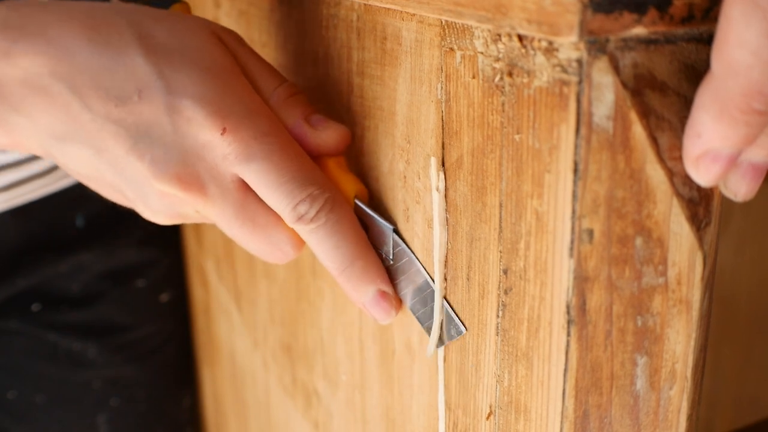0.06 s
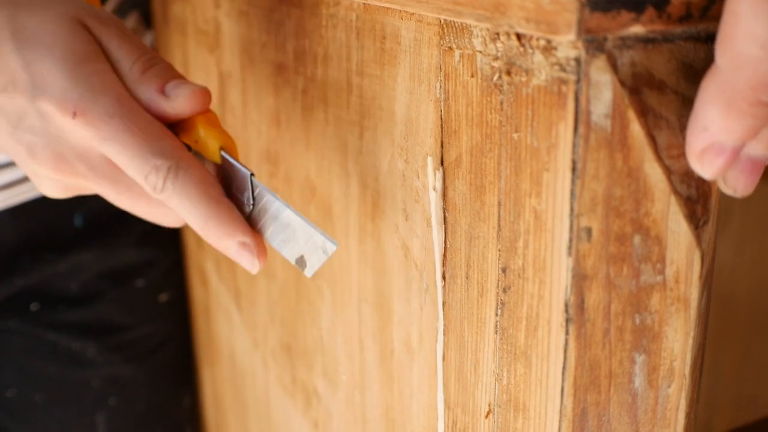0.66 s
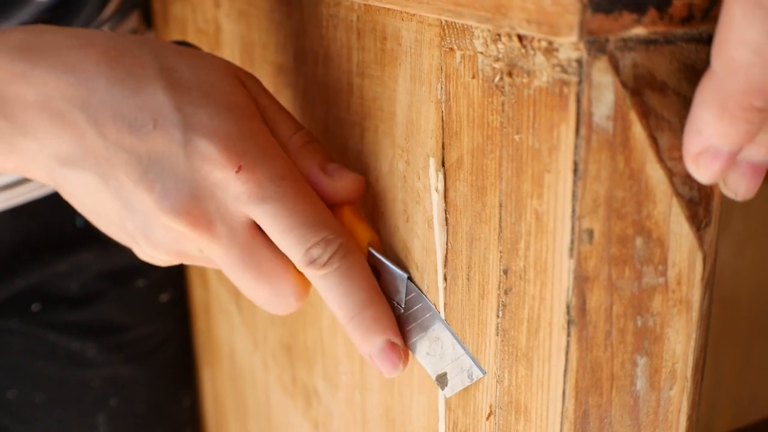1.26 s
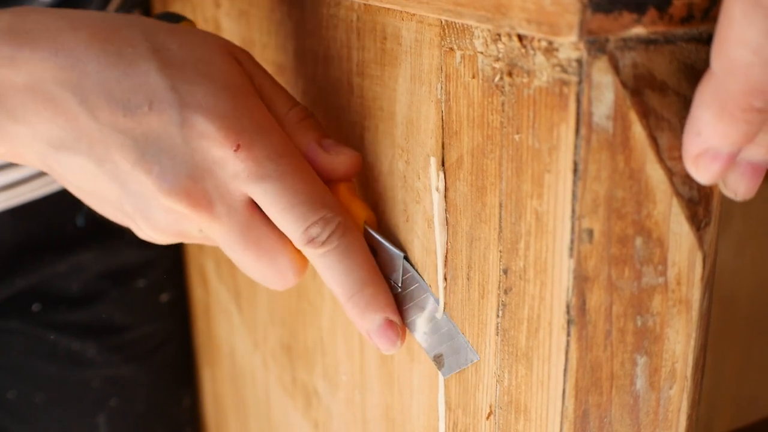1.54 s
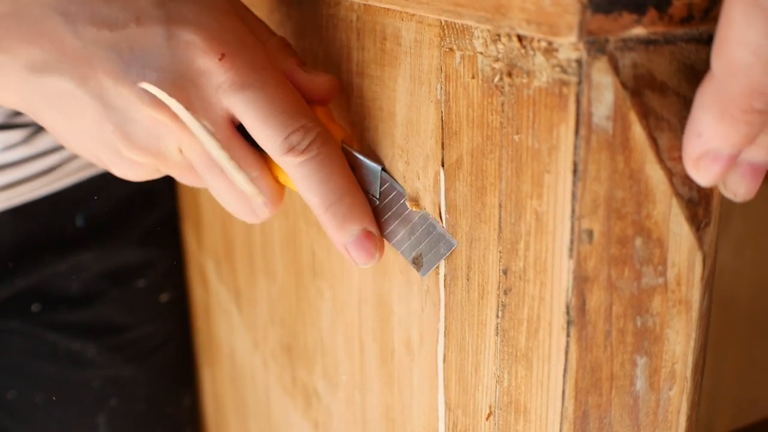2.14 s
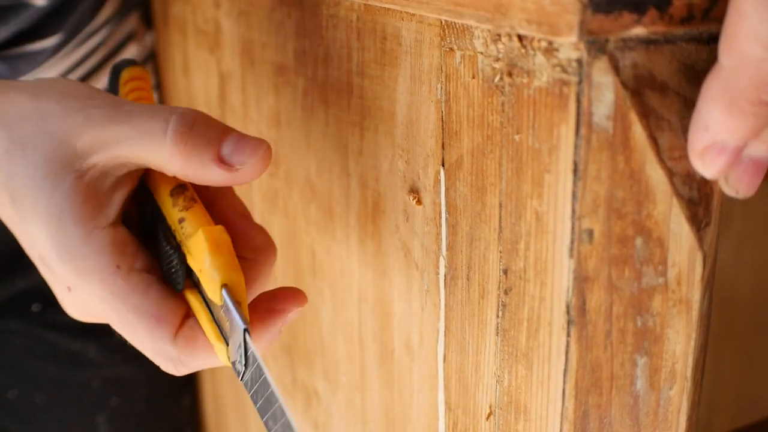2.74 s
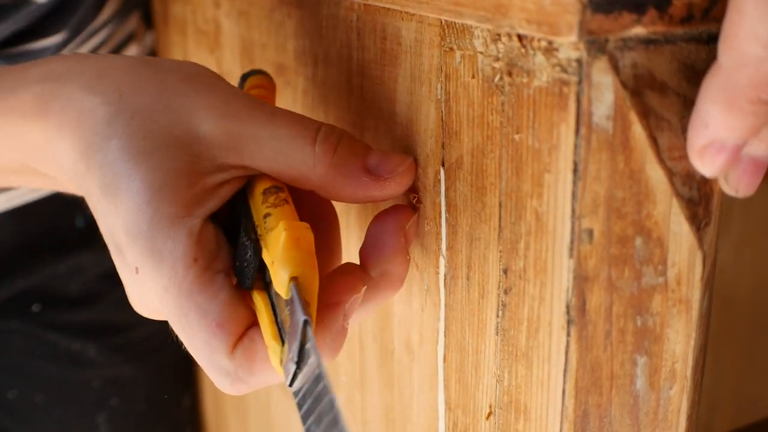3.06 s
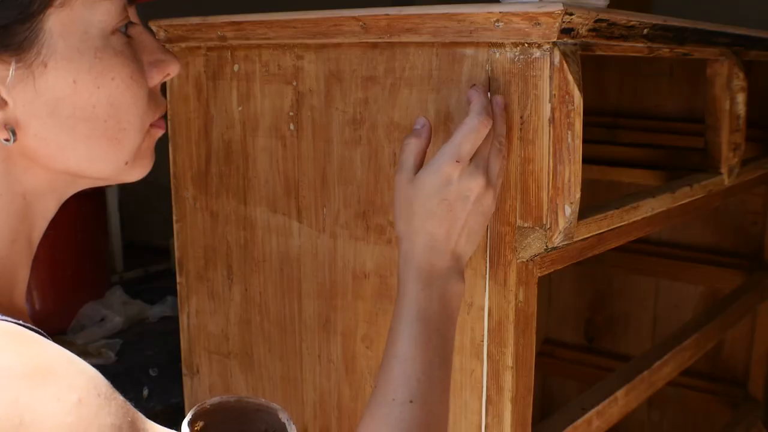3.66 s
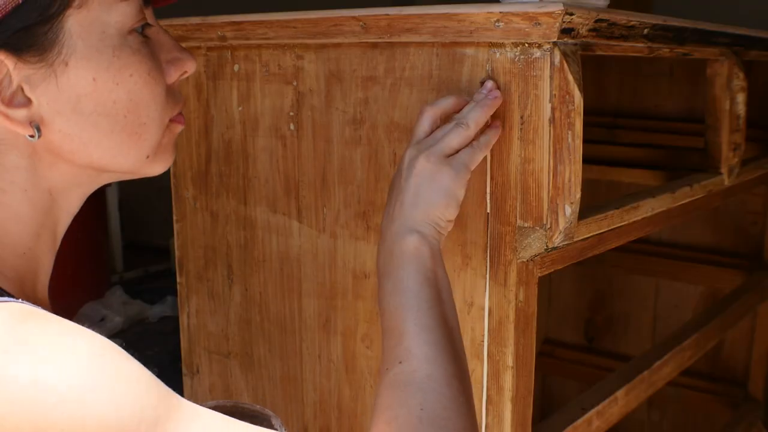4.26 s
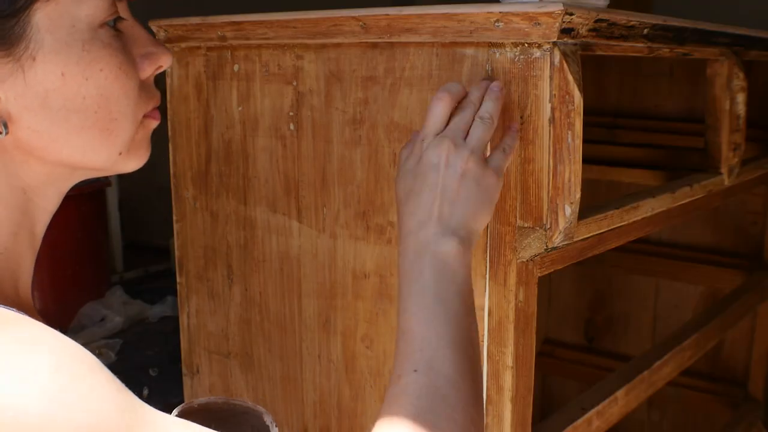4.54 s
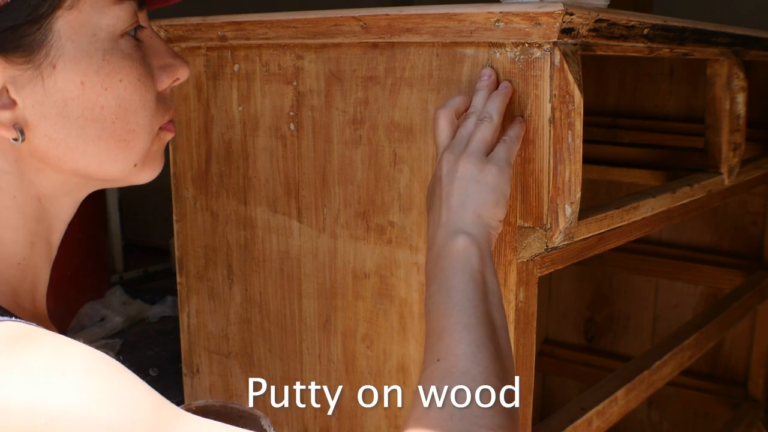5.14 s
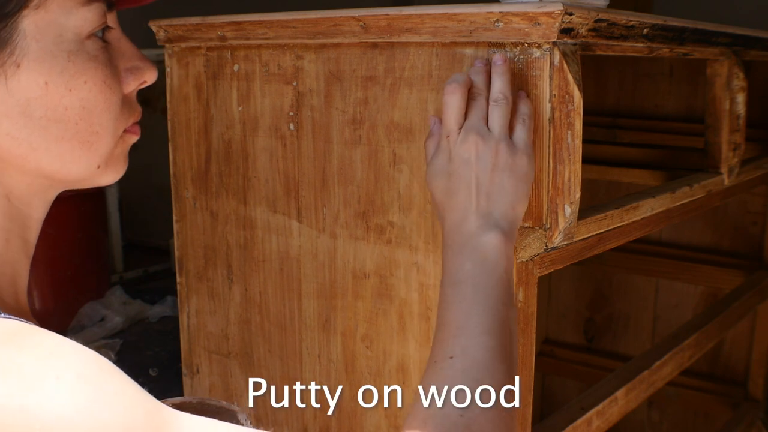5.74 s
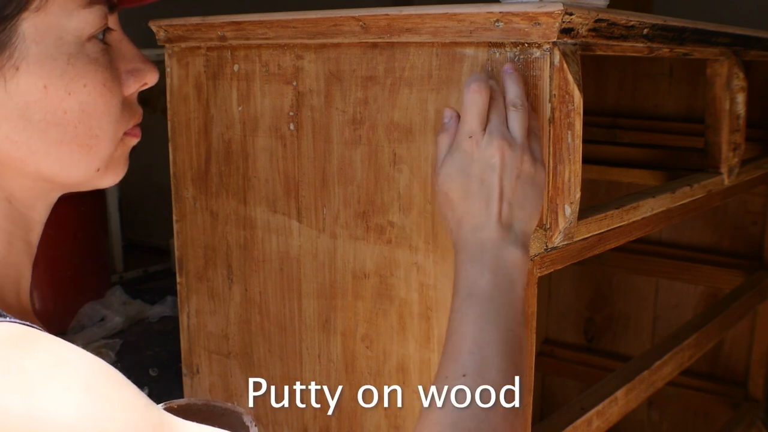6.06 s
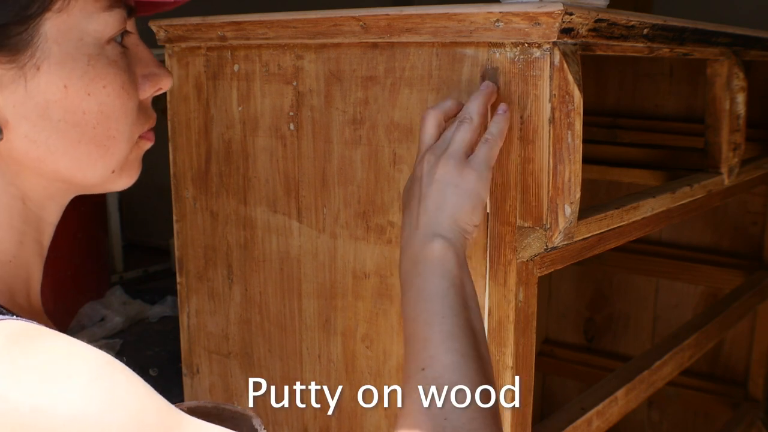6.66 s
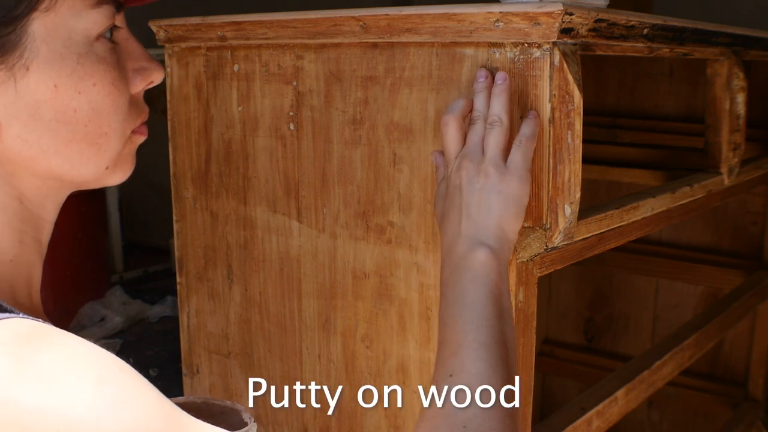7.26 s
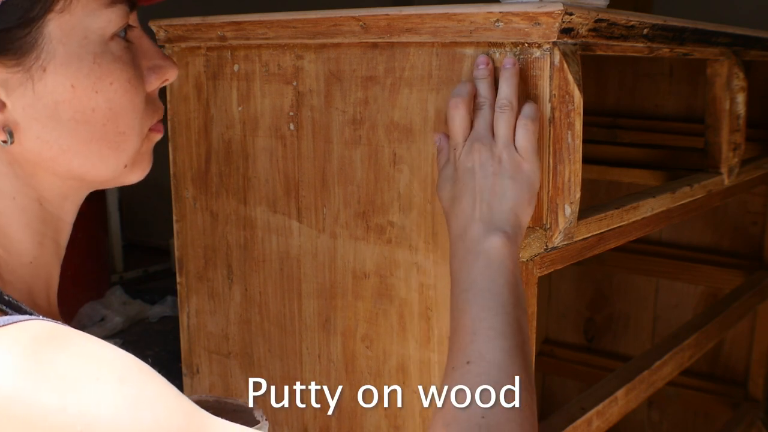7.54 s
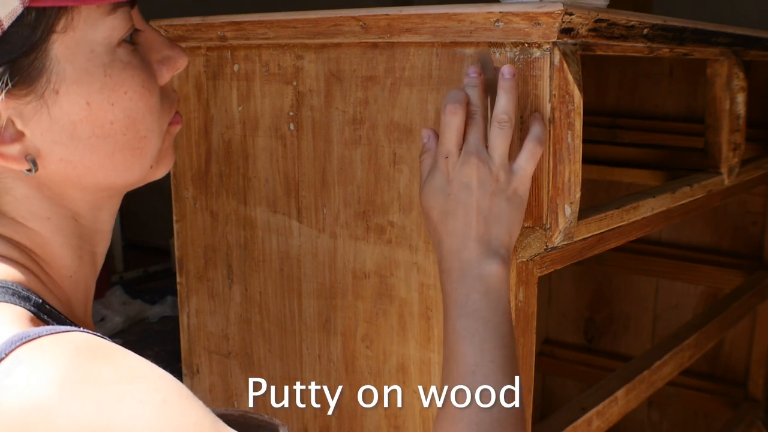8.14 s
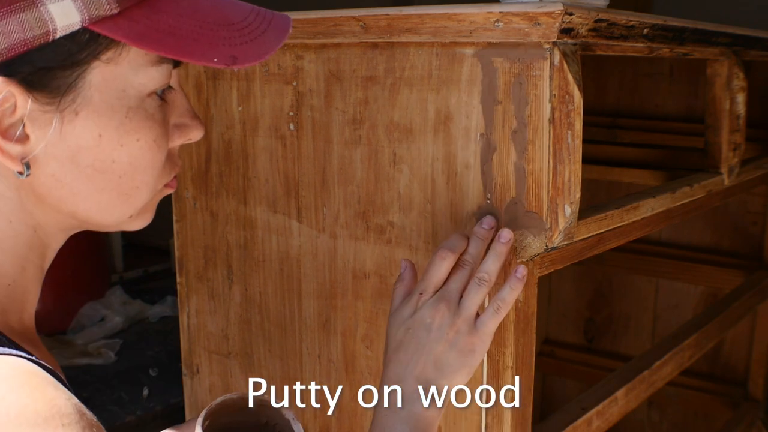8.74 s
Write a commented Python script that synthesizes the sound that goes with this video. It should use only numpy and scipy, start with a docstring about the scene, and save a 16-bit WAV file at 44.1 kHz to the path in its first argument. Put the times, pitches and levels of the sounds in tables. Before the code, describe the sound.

A knife blade pares filler from a wooden panel in short, gritty strokes, with sharp snaps, ticks and hollow knocks, then rattles lightly in its handle. Soft, sticky fingertip wipes follow. The stereo microphone is close to this outdoor work, with a street far behind: traffic murmurs throughout, and in the second half come thin squeals, passing tyres, a motor's hum and finally a low engine drone gathering speed.

```python
"""Outdoors at a wooden cabinet, a stereo microphone close to the work and the street far behind.
A snap-off utility knife pares a strip of filler from a crack: the blade rasps through the fibres, breaks
through with a snap, knocks the panel and rattles in its plastic handle. Then fingertips smear putty into
the crack. Traffic murmurs throughout; far off come faint squeals, the tyres of a passing car, an idling
motor and the swelling drone of an engine."""
import sys
import numpy as np
from scipy import signal
from scipy.fft import rfft, irfft, next_fast_len
from scipy.io import wavfile

SR = 44100
rng = np.random.default_rng(int(sys.argv[2]) if len(sys.argv) > 2 else 0)


def transcribe(u):
    """Save the signal u as a 16-bit wav file named by the first command-line argument.

    u: samples, shape (n,) or (channels, n), limited to [-1, 1]; the rate is SR.
    q: integer samples, one column per channel.
    """
    v = np.clip(np.atleast_2d(u).T, -1, 1)
    q = np.round(v * 32767).astype(np.int16)
    wavfile.write(sys.argv[1], SR, q)


N = 397326
TIME = np.arange(N) / SR
COARSE_TIME = TIME[::32]
FFT_SIZE = next_fast_len(N + SR // 2)
FREQ = np.maximum(np.arange(FFT_SIZE // 2 + 1) * SR / FFT_SIZE, 1)
RISE_SHARE = 0.037   # a soft contact swells and dies slowly: rise time as a share of its t60


def amp(db):
    """Decibels to gain."""
    return np.exp(np.asarray(db) * (np.log(10) / 20))


def unit_rms(x):
    """Scale to unit power."""
    return x / np.sqrt(np.mean(x ** 2) + 1e-20)


def curves(rows):
    """Each column after the first, joined by straight lines in time."""
    times, *columns = np.transpose(rows)
    return [np.interp(TIME, times, column) for column in columns]


def gate(start, end, fade_s):
    """A gate with sloping edges."""
    return np.clip(np.minimum(TIME - start, end - TIME) / fade_s + .5, 0, 1)


def gains(colour):
    """Gain at every frequency from (freq_hz, level_db) points."""
    hz, db = np.transpose(colour)
    return amp(np.interp(np.log(FREQ), np.log(hz), db))


def shaped(x, gain):
    """Colour a sound with a gain for every frequency."""
    return irfft(rfft(x, FFT_SIZE) * gain, FFT_SIZE)[..., :N]


def butter(x, hz, kind, order=2):
    """Butterworth filter."""
    return signal.sosfilt(signal.butter(order, hz, kind, fs=SR, output="sos"), x + 1e-18)


def panned(x, left_db):
    """Place a sound by its left-minus-right level."""
    return x * amp(np.array([[1], [-1]]) * left_db / 2)


def drift(rate_hz):
    """A random wander with spread 1."""
    return unit_rms(np.interp(TIME * rate_hz, np.arange(8192), rng.standard_normal(8192)))


def tone(hz):
    """A sine of unit power that follows a pitch curve."""
    return np.sqrt(2) * np.sin(2 * np.pi * np.cumsum(hz) / SR)


def grains(per_s, spread_db):
    """Random clicks of uneven size, at unit power."""
    out = np.zeros(N)
    at = np.flatnonzero(rng.random(N) < per_s / SR)
    out[at] = amp(spread_db * np.minimum(rng.exponential(1, len(at)), 4)) * rng.standard_normal(len(at))
    return unit_rms(out)


def bursts(rows):
    """Summed envelope of contacts (start_s, level_db, rise_s, t60_s): a swell, then an exponential fall."""
    out = np.zeros(N)
    for start, db, rise, t60 in rows:
        first = int(start * SR)
        age = TIME[:min(SR // 2, N - first)]
        fall = amp(db - 60 * np.maximum(age - rise, 0) / t60)
        out[first:first + len(age)] += np.minimum(age / rise, 1) * fall
    return out


def resonate(force, modes, ring_db):
    """A contact heard directly and, in the first 4 s, through the modes of the body it shakes."""
    out, drive = force.copy(), force[:4 * SR] + 1e-18
    for hz, db, t60 in modes:
        radius, angle = amp(-60 / (t60 * SR)), 2 * np.pi * hz / SR
        ringing = signal.lfilter([0, np.sin(angle)], [1, -2 * radius * np.cos(angle), radius ** 2], drive)
        out[:len(drive)] += ringing * amp(db + ring_db) * 2 * np.log(1000) / (t60 * SR)
    return out


def strike(times, levels_db, modes, detune):
    """Blows ring a body, each slightly out of tune; levels_db has one level per blow and mode."""
    hz, mode_db, t60 = np.transpose(modes)
    out, age = np.zeros(N), TIME[:SR // 5]
    polarity = (-1.) ** np.arange(len(hz))[:, None]
    decays = polarity * amp(-60 * age / t60[:, None])
    tunings = hz * (1 + detune * rng.standard_normal(levels_db.shape))
    for start, db, pitches in zip(times, levels_db, tunings):
        first = int(start * SR)
        partials = decays * np.sin(2 * np.pi * pitches[:, None] * age)
        out[first:first + len(age)] += amp(db + mode_db) @ partials
    return out


def clicks(rows, clack_hz, tick_hz, clack_db, tick_db):
    """Each contact is a tight cluster of tiny slips: a low clack and a high tick."""
    clack = bursts([(start, db + clack_db, RISE_SHARE * t60, t60) for start, db, _, t60 in rows])
    tick = bursts([(start, db + tick_db, RISE_SHARE * t60, t60) for start, _, db, t60 in rows])
    slips = grains(20000, 1.6)
    low, high = [unit_rms(butter(slips, band, "band")) for band in (clack_hz, tick_hz)]
    return clack * low + tick * high


def pings(rows, modes, low_db, high_db, detune, spread_db=5.0):
    """The first hard touch of each contact sets the knife ringing, differently every time."""
    start, clack, tick, t60 = np.transpose(rows)
    is_high = np.array(modes)[:, 0] > 6000
    levels = np.where(is_high, tick[:, None] + high_db, clack[:, None] + low_db)
    levels += spread_db * rng.standard_normal(levels.shape)
    return strike(start + RISE_SHARE * t60 / 2, levels, modes, detune)


MIDDLE_S = (3.67, 8.48)   # the background steps abruptly in level and colour at these two times
# far traffic before, during and after the middle stretch: level_db, left_lead_s
MURMUR_STRETCHES = [(-48.5, .00005), (-44, .0002), (-51.5, 0.00017)]
# its colour in each stretch: freq_hz, level_db
MURMUR_EARLY = [(30, -44), (55, -28.5), (80, -15.5), (125, -4.5), (160, 2), (240, -3.5), (350, -10),
                (520, -8.5), (700, -6), (900, -10), (1100, -6.5), (1700, -21.5), (3000, -31), (6000, -41.5),
                (9000, -54)]
MURMUR_MIDDLE = [(30, -53), (50, -26), (76, -19.5), (110, -13.5), (150, -6.5), (210, -6.5), (290, -13),
                 (440, -14.5), (560, -12), (870, -14), (1620, -24.5), (2420, -35), (6000, -55.5), (9000, -65)]
MURMUR_LATE = [(30, -38), (75, -7.5), (130, -7.5), (210, -0.5), (380, -14), (480, -11), (700, -13),
               (1100, -22), (1860, -29), (2600, -36), (3700, -38.5), (6000, -46), (9000, -53)]
# its width across the microphones: freq_hz, side_minus_mid_db
MURMUR_WIDTH = [(30, -22), (80, -40), (200, -30), (400, -18), (700, -7), (1100, -2), (2400, -1), (6000, -1)]
# its lean to the left: freq_hz, left_minus_right_db
MURMUR_LEAN = [(150, 0), (400, 1), (700, 2.5), (1200, 3.5), (2400, 3), (5000, 0)]
# its slow swell: time_s, gain_db
MURMUR_SWELL = [(0.2, -0.5), (1.3, -2), (2.0, 0.74), (3.4, 1.5), (4.1, 0.5), (5.3, -0.5), (6.7, 1.67),
                (8.4, 2.5)]

def traffic_murmur():
    """Far traffic: alike on both sides in the bass, diffuse above, reaching the left microphone first."""
    mid, side = rfft(rng.standard_normal((2, N)), FFT_SIZE)
    spectrum = mid + np.array([[1], [-1]]) * side * gains(MURMUR_WIDTH)
    spectrum = panned(spectrum, 20 * np.log10(gains(MURMUR_LEAN)))
    edges, midrange = [-1, *MIDDLE_S, 10], (FREQ > 250) & (FREQ < 1600)
    colours = gains(MURMUR_EARLY), gains(MURMUR_MIDDLE), gains(MURMUR_LATE)
    out = 0
    for start, end, colour, (db, lead) in zip(edges, edges[1:], colours, MURMUR_STRETCHES):
        gain = colour / np.sqrt(np.mean(colour ** 2 * midrange))
        turn = np.exp(1j * np.pi * FREQ * lead * FREQ / (FREQ + 350))   # the lead shrinks in the bass
        stretch = irfft(spectrum * gain * np.array([turn, turn.conj()]), FFT_SIZE)[:, :N]
        out += amp(db) * gate(start, end, .01) * stretch
    return out * amp(curves(MURMUR_SWELL)[0])


# the microphones' own noise: freq_hz, level_db
HISS_COLOUR = [(2000, -6), (4000, -6), (6500, 1), (8000, -1), (10000, 2), (12500, -2), (15500, -5)]

def microphone_hiss(level_db=-70.0, unshared_db=0.5):
    """Faint steady hiss, partly shared by the two microphones."""
    noise = rng.standard_normal(N) + amp(unshared_db) * rng.standard_normal((2, N))
    return amp(level_db) * unit_rms(shaped(noise, gains(HISS_COLOUR)))


# blade strokes, close up: full_pressure_s, held_s, rise_s, release_s, rasp_db, hiss_db, panel_db
STROKES = [(0.085, 0.084, 0.11, .03, -51, -46, -44.5), (0.342, 0.05, 0.07, .09, -53, -47.5, -43),
           (0.468, 0.042, 0.095, 0.039, -44, -43, -36.5), (0.565, 0.035, 0.049, 0.15, -39.5, -44, -50.5),
           (0.696, 0.0052, 0.015, 0.013, -40.5, -30, -64), (1.56, .05, 0.29, .05, -62, -64.5, -67),
           (1.672, 0.026, 0.062, 0.027, -46.5, -45, -41), (1.95, 0.051, .10, 0.044, -52, -51.5, -50),
           (2.15, 0.0092, 0.043, 0.11, -42, -50, -37), (2.36, 0.021, 0.065, .015, -57, -57, -62),
           (2.434, 0.035, 0.032, 0.026, -41, -37.5, -48.5)]
# colours of the cut and of the drag on the panel: freq_hz, level_db
RASP_COLOUR = [(300, -30), (1200, -7.5), (1850, -1.5), (2350, 1.5), (3200, -1), (4000, -5.5), (5000, -7),
               (6300, -8), (7600, -7), (8500, -2), (9300, -2), (10200, 0), (11800, -2), (13400, -6),
               (15500, -13)]
DRAG_COLOUR = [(40, -45.5), (100, -8), (160, 0.5), (300, -10.5), (480, 1), (750, -1), (1300, 0.5),
               (1900, -15), (3000, -34)]

def scraping(linger_db=-14.5, linger_t60_s=.55, snags_per_s=80, snag_s=.001, split_hz=5500):
    """The edge tears fibres unevenly and snags. Returns the forces on the blade and on the panel."""
    start, held, rise, release, *levels_db = np.transpose(STROKES)[:, :, None]
    before, after = np.maximum(start - COARSE_TIME, 0), np.maximum(COARSE_TIME - start - held, 0)
    pressure_db = -20 * (before / rise + after / release)
    cutting, fibres, bite = [np.interp(TIME, COARSE_TIME, amp(np.max(db + pressure_db, axis=0)))
                             for db in levels_db]
    linger = bursts([(at, db + linger_db, hold, linger_t60_s) for at, hold, _, _, db, _, _ in STROKES])
    chatter = amp(.97 * drift(140))
    # stiff fibres hold the edge for an instant
    snags = (rng.random(N) < snags_per_s / SR) * rng.uniform(0, 2.2, N)
    grit = 1 + .9 * signal.lfilter([1], [1, -np.exp(-1 / (snag_s * SR))], snags + 1e-18)
    tearing = shaped(grains(14000, 2.5), gains(RASP_COLOUR))
    low, high = [unit_rms(butter(tearing, split_hz, kind, order=4)) for kind in ("low", "high")]
    rasp = amp(-4) * np.maximum(cutting * grit, linger) * low
    hiss = amp(-2.5) * fibres * grit * high
    drag = amp(-2) * bite * unit_rms(shaped(grains(2500, 2.5), gains(DRAG_COLOUR)))
    return (rasp + hiss) * chatter, drag * chatter


# the cabinet panel: pitch_hz, level_db, t60_s
PANEL_MODES = [(125, -5, 0.17), (170, -8, .15), (232, -6, 0.15), (405.7, -1.5, 0.17), (458, -3.5, 0.15),
               (517, -2, .15), (604.5, -6, .14), (660, -7.5, .09), (750, -7, 0.11), (805, -6, .09),
               (925, -9, .09), (1035, -7.5, .08), (1255, -11, .09), (1400, -16, .08)]
# hand and handle bump it: start_s, level_db, favoured_hz
KNOCKS = [(0.517, -34.5, 800), (1.124, -34, 800), (1.139, -39.5, 476), (2.137, -42, 1100),
          (2.149, -30, 1100), (2.160, -32.5, 540), (2.176, -37, 380), (2.184, -31, 170),
          (2.215, -38.5, 420), (8.641, -41, 750)]

def cabinet_panel(drag, db_per_octave=5.0, spread_db=.64):
    """Drag and soft bumps ring the panel; a bump feeds the modes near the pitch its spot favours."""
    start, db, favoured_hz = np.transpose(KNOCKS)
    octaves_off = np.abs(np.log2(np.array(PANEL_MODES)[:, 0] / favoured_hz[:, None]))
    levels = db[:, None] - db_per_octave * octaves_off + spread_db * rng.standard_normal(octaves_off.shape)
    knocks = butter(strike(start, levels, PANEL_MODES, detune=.008), [90, 1700], "band")
    return resonate(drag, PANEL_MODES, ring_db=1.5) + knocks


# the blade catches on the wood: start_s, clack_db, tick_db, t60_s
CATCHES = [(0.078, -54, -49, .015), (0.1385, -35, -35, 0.015), (0.153, -56, -49, 0.013),
           (0.162, -51, -44, 0.013), (0.169, -46, -47, 0.011), (0.683, -50, -37, .02),
           (0.9755, -28.5, -28, 0.036), (1.076, -46, -48, 0.024), (1.101, -43.5, -42.5, 0.083),
           (2.357, -57, -43, .06), (2.377, -59, -47, 0.027), (2.406, -41, -53, 0.017),
           (2.4215, -38.5, -40, 0.015), (2.428, -37, -30.5, 0.027), (2.4445, -28, -24.5, 0.015),
           (2.452, -32, -37, 0.025), (2.459, -37, -35, 0.017), (2.4755, -31, -32, 0.011)]
# the blade is under the strip: start_s, breaks_free_s, wedged_share
CUTS = [(-1, 0.5157, .95), (1.4, 2.127, .2)]
# the blade wedged, sprung free and lying on the wood: pitch_hz, level_db, t60_s
WEDGED_MODES = [(2350, 6.5, .03), (2830, 1, .03), (4080, -4, .02), (6550, -2, .014), (7220, -3.5, .012),
                (8600, 0, .007), (10100, -3, .006), (11100, -3, .005), (13400, 3.5, .008)]
FREE_MODES = [(2024, 9, 0.096), (2379, 7, .14), (2755, 1.5, .12), (3064, -3, .1), (3601, -2, .12),
              (4689, -5, .07), (5690, -9, .04), (8710, -6, .02), (9566, -5, .02), (10344, -6, .02),
              (11300, -6, .02)]
LYING_MODES = [(1370, 8.5, .028), (2063, -4, .04), (2390, -2, .03), (3280, 4, 0.041), (4220, -0.5, .015),
               (5440, -8, 0.031), (6950, -3, 0.024), (7470, 3, .02), (8130, 6, .025), (9730, -6, 0.022),
               (10200, 2, .02), (13000, -4, 0.019)]

def knife_blade(rasp, free_s=.25, lean_below_hz=4200):
    """Rasp, catches and snaps sound through a blade that rings differently wedged, free or lying."""
    force = rasp + clicks(CATCHES, clack_hz=[2300, 6400], tick_hz=[5600, 11400], clack_db=-1, tick_db=-1)
    cracks, shiver = strip_snaps()
    cutting = sum(gate(start, end, .002) for start, end, _ in CUTS)
    wedged = sum(share * gate(start, end, .002) for start, end, share in CUTS)
    free = sum(gate(end, end + free_s, .002) for _, end, _ in CUTS)
    lying = 1 - cutting - free
    in_wood = force * (cutting - wedged) + resonate(force * wedged, WEDGED_MODES, ring_db=0)
    on_wood = resonate(force * lying, LYING_MODES, ring_db=-1.5)
    on_wood += lying * pings(CATCHES, LYING_MODES, low_db=-20, high_db=-15, detune=.008)
    jolt = amp(-12) * cracks
    sprung = resonate(force * free + shiver + jolt, FREE_MODES, ring_db=-.5) - jolt
    sprung_low = shaped(sprung, 1 / (1 + (FREQ / lean_below_hz) ** 4))
    return in_wood + on_wood + cracks + sprung - sprung_low + panned(sprung_low, left_db=-6.5)


# crumbs at the crack: start_s, level_db
CRUMBS = [(0.207, -46), (0.264, -42), (0.376, -35), (1.711, -49), (1.873, -49.5), (2.008, -43),
          (3.177, -42.5), (3.329, -45), (3.345, -39), (3.426, -43), (4.527, -53), (5.41, -54),
          (6.327, -51.5), (6.802, -47)]
# colour of crumbs and putty, close up: freq_hz, level_db
PUTTY_COLOUR = [(2000, -10), (4000, -6), (6500, -5), (8000, -5), (10000, 3.5), (12500, 1.5), (15500, -5.5)]

def crumbs(gain_db=-5.5, rise_s=.0006, t60_s=.013):
    """Small dry crumbs break away, each a short spray of clicks."""
    envelope = bursts([(start, db + gain_db, rise_s, t60_s) for start, db in CRUMBS])
    return shaped(envelope * grains(20000, 1.5), unit_rms(gains(PUTTY_COLOUR)))


def blade_singing(start_s=.3, end_s=.5, pitch_hz=8580, width_hz=399.5, level_db=-63):
    """Friction keeps one narrow resonance of the wedged blade sounding until it breaks free."""
    band = [pitch_hz - width_hz / 2, pitch_hz + width_hz / 2]
    note = unit_rms(butter(rng.standard_normal(N), band, "band"))
    return amp(level_db) * gate(start_s, end_s, .04) * note


# the strip gives way: start_s, crack_db, length_s, tail_db, tail_t60_s, shiver_db
SNAPS = [(0.5155, -5, .0024, -11, .006, -26.5), (2.129, -32, 0.0011, -39.5, .01, -56),
         (2.1344, -31, .0015, -34, .015, -45), (2.141, -28.5, 0.00198, -30, .018, -38),
         (2.15, -28.5, .0018, -30, .018, -38)]
# colours of the crack and of the blade's shiver: freq_hz, level_db
CRACK_COLOUR = [(300, -32), (1300, -19.5), (2050, -11), (3300, -14), (4200, -13), (5600, -6), (6400, -13),
                (7300, -3), (8500, -4), (9600, 1), (11200, 1), (12400, -5), (13100, -3), (14200, -10.5),
                (15500, -13)]
SHIVER_COLOUR = [(100, -30), (450, -12), (700, -1.5), (1250, -10), (2000, 3), (3000, 0), (4000, -6),
                 (7000, -10), (9500, -4.5), (15500, -19.5)]

def strip_snaps():
    """Each break is a short, bright crack of all pitches at once. Returns the cracks and their shiver."""
    hz, colour_db = np.transpose(CRACK_COLOUR)
    cracks = np.zeros(N)
    for (start, db, length, *_), phases in zip(SNAPS, rng.random((len(SNAPS), 256))):
        first, count = int(start * SR), int(length * SR)
        pitches = np.fft.rfftfreq(count, 1 / SR)
        spectrum = amp(np.interp(pitches, hz, colour_db)) * np.exp(2j * np.pi * phases[:len(pitches)])
        cracks[first:first + count] += amp(db) * unit_rms(irfft(spectrum, count))
    tails = bursts([(start + length, db, .0002, t60) for start, _, length, db, t60, _ in SNAPS])
    shivers = bursts([(start, db, .004, .06) for start, *_, db in SNAPS])
    tail_noise, shiver_noise = [unit_rms(shaped(rng.standard_normal(N), gains(colour)))
                                for colour in (CRACK_COLOUR, SHIVER_COLOUR)]
    return cracks + tails * tail_noise, shivers * shiver_noise


# the plastic handle: pitch_hz, level_db, t60_s
HANDLE_MODES = [(2320, 3, 0.033), (2486, 4.5, 0.048), (3250, -1, .018), (3447, -1, .016), (4200, -2, 0.013),
                (4960, -5, .02), (5980, -6, 0.02), (6880, -4.5, 0.024), (7140, -5, 0.025), (8300, -6, .05),
                (9760, -9, .05)]
# taps inside it: start_s, clack_db, tick_db, t60_s
RATTLES = [(2.6935, -45, -47, 0.097), (2.7495, -38.5, -45, .065), (2.782, -52, -58, .06),
           (2.797, -45, -40, 0.039), (2.8232, -27.5, -30, 0.014), (2.828, -39.5, -42, 0.035),
           (2.833, -33, -42, 0.03), (2.907, -46.5, -53, 0.056), (2.918, -60, -52, .04),
           (2.968, -43.5, -45, 0.032), (3.284, -56.5, -57, .04), (3.571, -58, -66, .05)]

def handle_rattle():
    """Off the wood, the loose blade taps in its hollow handle."""
    taps = clicks(RATTLES, clack_hz=[2400, 7300], tick_hz=[5200, 11800], clack_db=-1, tick_db=-1.5)
    ringing = pings(RATTLES, HANDLE_MODES, low_db=-13.5, high_db=-7, detune=.03)
    return resonate(taps, HANDLE_MODES, ring_db=2) + ringing


# fingertip wipes, close up: peak_s, level_db, swell_s, fade_s
WIPES = [(3.345, -60, 0.013, .01), (4.25, -74.5, .12, .12), (4.534, -55.5, 0.016, 0.013),
         (5.415, -64.5, .06, .02), (6.03, -72.5, .13, .12), (6.785, -63, .06, .02),
         (6.802, -57.5, .012, .007), (7.53, -72.5, .04, .06), (7.87, -75, .05, .05),
         (8.055, -59, 0.031, .025), (8.5, -69, 0.031, .03)]

def putty_wipes(stick_db=1.6, ticks_per_s=130, ticks_db=-11):
    """Fingertips slide on the tacky putty, whose threads part with fine ticks."""
    pressure = 0
    for peak, db, swell, fade in WIPES:
        width = np.where(COARSE_TIME < peak, swell, fade)
        pressure += amp(db) * np.exp(-.5 * ((COARSE_TIME - peak) / width) ** 2)
    tack = grains(3000, 1.3) + amp(ticks_db) * grains(ticks_per_s, 1.5)
    friction = np.interp(TIME, COARSE_TIME, pressure) * amp(stick_db * drift(120)) * tack
    return shaped(friction, unit_rms(gains(PUTTY_COLOUR)))


# faint squeals, far off: start_s, pitch_hz, glide_hz_per_s, level_db, rise_s, t60_s, noisy_share
SQUEALS = [(3.66, 4560, -900, -69.5, .04, 1.0, .6), (3.81, 3230, -900, -71.5, .03, .5, 0),
           (3.9, 4980, -2000, -71, .06, 1.2, .95), (4.04, 3760, 1199.5, -59, 0.1, 0.42, .25),
           (4.24, 4020, 400, -62.5, 0.05, 0.9, .3), (8.56, 3800, -1000, -70, .043, .7, .6)]

def far_squeals(flutter_db=2.0, wander_hz=50):
    """Short gliding notes swell and die, from narrow hiss to thin fluttering tone."""
    out = np.zeros(N)
    flutter, wander, rough = amp(flutter_db * drift(70)), wander_hz * drift(120), drift(750)
    for start, hz, glide, db, rise, t60, noisy in SQUEALS:
        span = slice(int(start * SR), int(start * SR) + SR // 2)
        age = TIME[span] - start
        level = np.minimum(age / rise, 1).clip(0) ** 1.6 * amp(db - 60 * np.maximum(age - rise, 0) / t60)
        roughness = np.sqrt(1 - noisy) + np.sqrt(noisy) * rough[span]
        out[span] += level * tone(hz + glide * age + wander[span]) * roughness
    return out * flutter


def passing_car(nearest_s=4, half_length_s=2.5, level_db=-59, centre_hz=900):
    """An octave of diffuse tyre noise swells and fades, off to the left."""
    octave = [centre_hz / np.sqrt(2), centre_hz * np.sqrt(2)]
    tyres = unit_rms(butter(rng.standard_normal((2, N)), octave, "band"))
    level = amp(level_db) / (1 + ((TIME - nearest_s) / half_length_s) ** 2)
    return panned(tyres * level * gate(*MIDDLE_S, .02), left_db=7)


def speeding_up(start_s, from_hz, to_hz, settle_s):
    """A motor's rate closes in on its final value ever more slowly."""
    return to_hz + (from_hz - to_hz) * np.exp(-np.maximum(TIME - start_s, 0) / settle_s)


def wavering():
    """Moving air makes a distant tone's level flutter."""
    return amp(2.2 * drift(22) - .5)


# a motor idling down the street: time_s, level_db
IDLE_LEVEL = [(3.95, -46.5), (4.25, -62.5), (4.55, -46), (5.1, -49), (5.75, -42.5), (6.08, -50.5),
              (6.35, -46), (7.1, -52.5), (8.4, -50)]

def idling_motor(stray_hz=3.73):
    """An idling motor hums on one unsteady note and creeps up in speed."""
    level = amp(curves(IDLE_LEVEL)[0]) * wavering() * gate(*MIDDLE_S, .027)
    pitch = speeding_up(start_s=3.7, from_hz=112, to_hz=128, settle_s=3.6)
    return level * tone(pitch + stray_hz * drift(30))


# a distant engine's orders, fading in turn: time_s, second_db, third_db, fifth_db
ENGINE_ORDERS = [(6.8, -59, -43, -52.5), (6.96, -40, -42.5, -60.5), (7.2, -34.5, -41, -54),
                 (7.34, -31.5, -36.5, -59.5), (7.54, -51.5, -42, -58.5), (7.73, -40.5, -47.5, -52),
                 (8.04, -37.5, -43, -46), (8.17, -52.5, -36, -50), (8.42, -41.5, -43.5, -50)]

def distant_engine(stray_hz=.911):
    """An engine gathers speed, droning at multiples of its firing rate, each wavering on its own."""
    second, third, fifth = curves(ENGINE_ORDERS)
    firing_hz = speeding_up(start_s=6.8, from_hz=70, to_hz=77, settle_s=1.0)
    orders_db = {1: second - 22, 2: second, 3: third, 5: fifth}
    drone = sum(amp(db) * wavering() * tone(order * (firing_hz + stray_hz * drift(30)))
                for order, db in orders_db.items())
    return drone * gate(ENGINE_ORDERS[0][0], 10, .1) * gate(*MIDDLE_S, .027)


def with_echoes(x, t60_s=.3, band_hz=(500, 5970), wet_db=-9.5):
    """Weak scattered echoes from the cabinet and nearby walls, different at each microphone."""
    age = TIME[:SR // 2]
    scatter = rng.standard_normal((2, len(age))) * amp(-60 * age / t60_s) * (age > .003)
    echoes = butter(scatter, band_hz, "band", order=1)
    echoes /= np.sqrt(np.sum(echoes ** 2, axis=1, keepdims=True))
    return x + amp(wet_db) * signal.fftconvolve(x, echoes, axes=1)[:, :N]


# the knife works just right of centre, then is lifted away to the left: time_s, left_minus_right_db
KNIFE_PAN = [(0.5, -1), (2.2, -.5), (2.8, 3.5)]

def scene():
    """Close handwork near the centre, the street far behind."""
    rasp, drag = scraping()
    knife = knife_blade(rasp) + blade_singing() + handle_rattle()
    tool_work = panned(knife, curves(KNIFE_PAN)[0]) + panned(cabinet_panel(drag), left_db=-1.5)
    handwork = with_echoes(tool_work + crumbs() + putty_wipes())
    street = traffic_murmur() + far_squeals() + passing_car() + idling_motor() + distant_engine()
    return handwork + street + microphone_hiss()


def record(dry, notch_hz=7850, notch_q=14.0, notch_depth=.26, cutoff_hz=15750):
    """The microphone port hollows one treble band; the loudest peak overloads; the top is cut."""
    port_band = signal.lfilter(*signal.iirpeak(notch_hz, notch_q, fs=SR), dry)
    clipped = np.clip(dry - notch_depth * port_band, -.95, .95)
    return signal.sosfilt(signal.ellip(10, .1, 80, cutoff_hz, fs=SR, output="sos"), clipped)


dry = scene()
out = record(dry)
transcribe(out)
```